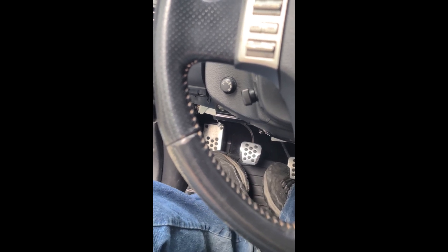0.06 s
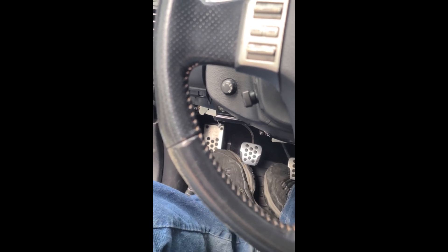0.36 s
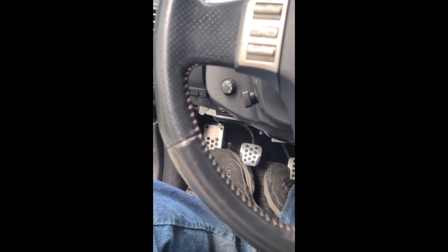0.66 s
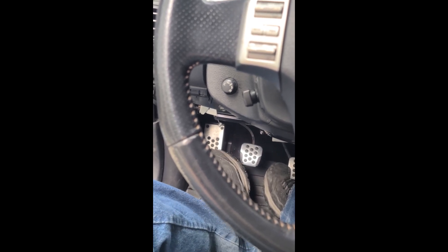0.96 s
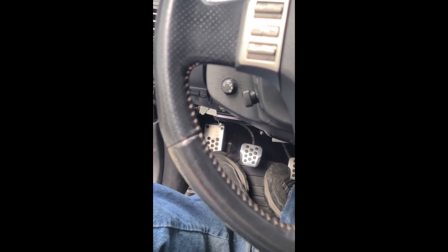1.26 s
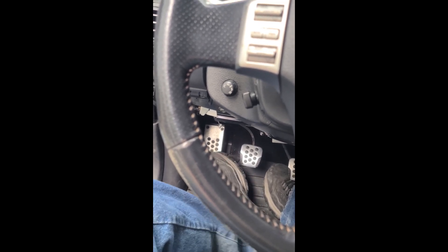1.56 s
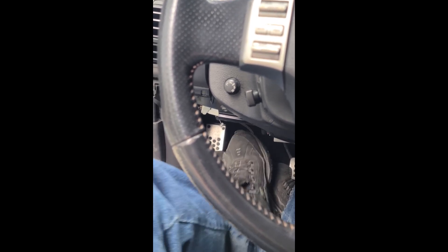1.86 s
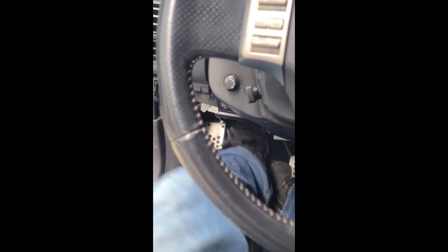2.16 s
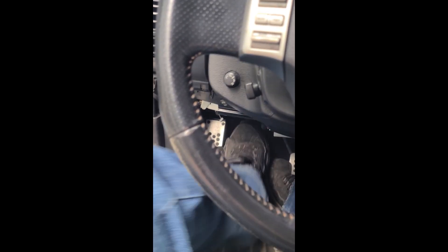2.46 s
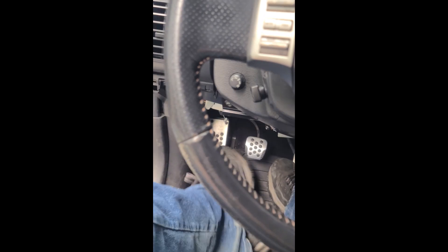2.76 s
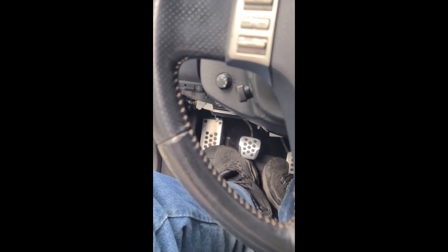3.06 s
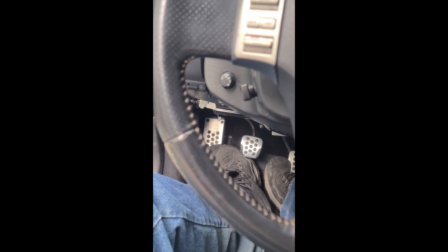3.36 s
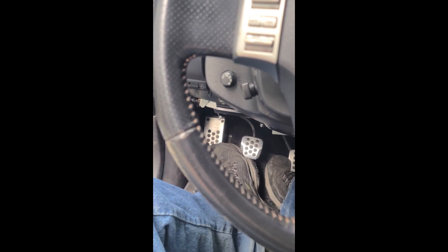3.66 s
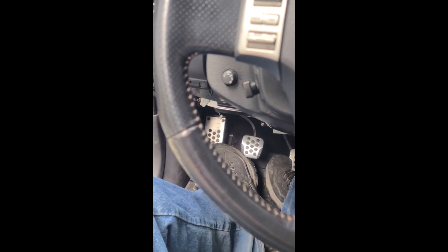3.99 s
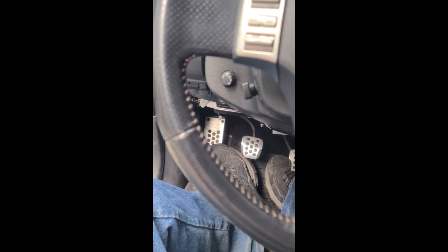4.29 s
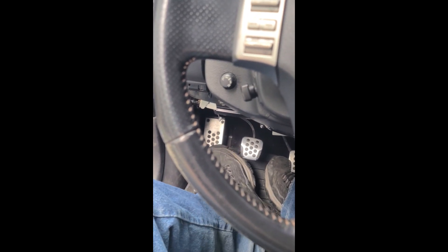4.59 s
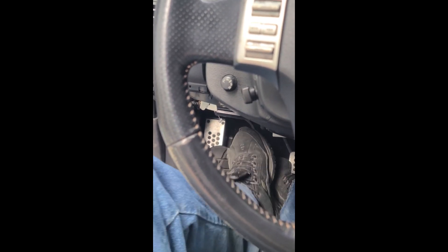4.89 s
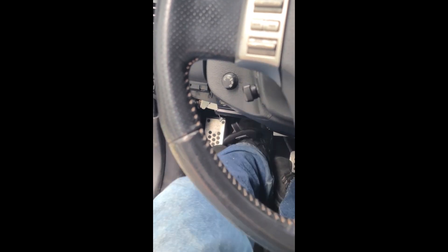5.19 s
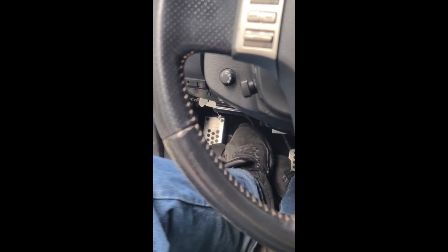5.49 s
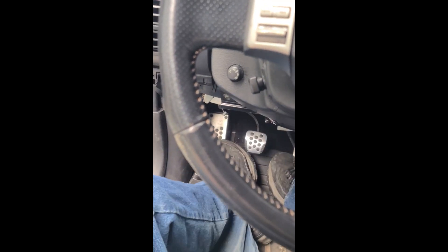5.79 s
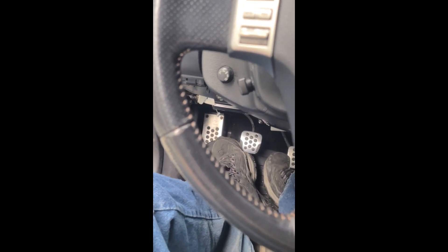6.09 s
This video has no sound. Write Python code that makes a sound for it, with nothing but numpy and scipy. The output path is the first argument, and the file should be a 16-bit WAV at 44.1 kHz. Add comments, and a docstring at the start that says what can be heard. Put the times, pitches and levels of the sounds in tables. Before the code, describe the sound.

A car clutch pedal is pressed and released twice, with dull clunks, light clicks and short creaks over a faint cabin rumble.

```python
"""A clutch pedal worked twice in a parked car, heard from above the steering wheel.
Over a faint cabin rumble, the slack rattles and the pedal clunks against its stop, ringing the bulkhead.
Faint, thin whistles glide by, a shoe scuffs, denim swishes, and at 2 s the foot stamps on the pad.
It rides the pedal down and back while the linkage knocks, ticks and groans along the stroke.
A second clunk at 3.7 s leads to a brighter stamp at 5 s and one more stroke."""
import sys
import numpy as np
from scipy import signal
from scipy.fft import rfft, irfft, next_fast_len
from scipy.io import wavfile

SR = 44100
rng = np.random.default_rng(int(sys.argv[2]) if len(sys.argv) > 2 else 0)


def dump(signal):
    """Clip the signal to [-1, 1] and save it as 16-bit WAV at the path in sys.argv[1]."""
    limited = np.clip(np.atleast_2d(signal).T, -1, 1)
    pcm = np.round(limited * 32767).astype(np.int16)
    wavfile.write(sys.argv[1], SR, pcm)


N = 270774
TIME = np.arange(N) / SR
RIGHT_LAG_S = .00027  # the right microphone hears the footwell later

# Resonances of pedal, bulkhead and cabin. Each row: pitch in Hz, 60 dB decay time in seconds,
# level in dB when struck at the stop, level in dB when struck at the pad.
BODY_MODES = [(63, .28, -26, -27), (75, .16, -16, -15), (103, .085, -10, -11), (128, .14, -18, -10),
              (151, .3, -22, -32), (172, .12, -35, -29), (250, .24, -21, -23), (274, .07, -20, -21),
              (360, .11, -21, -30), (396, .1, -21, -28), (446, .11, -44, -22), (480, .1, -48, -27),
              (705, .11, -32, -25), (750, .08, -34, -23), (802, .1, -38, -22), (877, .08, -31, -25),
              (945, .07, -42, -31), (1013, .1, -42, -24), (1220, .06, -51, -31), (1335, .06, -53, -31),
              (1448, .11, -55, -29), (1545, .09, -44, -34), (1857, .08, -58, -42), (2240, .1, -60, -44),
              (2447, .1, -62, -44), (2643, .1, -62, -41), (3163, .11, -62, -45), (3515, .1, -66, -47),
              (5000, .11, -70, -52)]
# The dull tone of a sole rubbing on rubber. Each row: frequency in Hz, level in dB.
SCUFF_COLOUR = [(120, -10), (250, -1), (440, 0), (600, -9), (950, -8), (1150, -13), (1500, -11),
                (1900, -18), (2700, -20), (4500, -29), (8000, -46)]


def amp(db):
    """Decibels to gain."""
    return 10 ** (np.asarray(db) / 20)


def unit(x):
    """Scales to an rms of one."""
    return x / np.sqrt(np.mean(x ** 2) + 1e-20)


def curve_at(points, hz):
    """Reads a curve on a log-frequency axis."""
    f, value = np.transpose(points)
    return np.interp(np.log(hz + 1), np.log(f + 1), value)


def fade(t, t60):
    """Free decay, 60 dB down after t60 seconds."""
    return np.exp(-np.log(1000) * t / t60)


def swell(t, length, rise, release):
    """Attack, hold and release between t = 0 and length."""
    return np.clip(np.minimum(t / rise, (length - t) / release), 0, 1)


def add(mix, s, sound):
    """Mixes a stereo sound in at s seconds."""
    part = mix[:, max(round(s * SR), 0):][:, :sound.shape[1]]
    part += sound[:, :part.shape[1]]


def drift(count, hz):
    """A random wobble with an rms of one, moving at up to about hz."""
    coarse = rng.standard_normal(count // 20 + 2)
    return unit(np.interp(np.arange(count) * 2 * hz / SR, np.arange(len(coarse)), coarse))


def diffuse(pair, colour, tilt_db=0):
    """Colours two noises, tilted in dB per octave, and spreads them: centred bass, wide treble."""
    # How alike the two sides are. Each row: frequency in Hz, left-right coherence.
    coherence = [(40, .95), (130, .98), (300, .88), (650, .45), (1300, 0), (16000, 0)]
    size = next_fast_len(pair.shape[1], True)
    hz = np.fft.rfftfreq(size, 1 / SR)
    left, unrelated = rfft(pair, size)
    same = curve_at(coherence, hz)
    right = same * left + np.sqrt(1 - same ** 2) * unrelated
    gain = unit(amp(curve_at(colour, hz) + tilt_db * np.log2(hz / SR + 1e-3)))
    return irfft(np.array([left, right]) * gain, size)[:, :pair.shape[1]]


def cabin_rumble(level_db=-43.6, waver_db=.7):
    """The bed: low rumble through the body shell, thinning into a faint hiss."""
    # The tone of the cabin. Each row: frequency in Hz, relative level in dB.
    colour = [(22, 10), (40, 1), (60, -.5), (92, 2), (125, -7), (200, -9), (390, -15), (630, -22),
              (1350, -23), (2000, -32), (5000, -40), (7700, -56), (9300, -51), (15500, -54)]
    return diffuse(rng.standard_normal((2, N)), colour) * amp(level_db + waver_db * drift(N, hz=6))


def cabin_tail(dry, wet_db=-12, bass_t60=.55, treble_t60=.16, build_s=.02):
    """A short reverb: upholstery soaks up the treble at once, while the bass lingers."""
    t = np.arange(SR // 2) / SR
    field = diffuse(rng.standard_normal((2, len(t))), [(0, 0), (SR, 0)])
    hz, frame_s, bands = signal.stft(field, SR, nperseg=512)
    t60 = curve_at([(100, bass_t60), (1500, treble_t60)], hz)[:, None]
    tail = signal.istft(bands * fade(frame_s, t60), SR, nperseg=512)[1][:, :len(t)]
    tail *= (1 - np.exp(-t / build_s)) / np.linalg.norm(fade(t, bass_t60))
    return amp(wet_db) * signal.fftconvolve(dry.mean(0)[None], tail, axes=1)[:, :N]


def denim_swish(grains, gain_db=2, edge_s=.06):
    """Denim slides as the knee moves: an airy brush, smoother than the sole."""
    # The knee's moves. Each row: start in seconds, length in seconds, relative level in dB.
    swishes = [(1.69, .36, -72.5), (2.0, .38, -76.5), (2.4, .38, -77), (4.6, .2, -80), (5.17, .38, -76.5),
               (5.55, .28, -80)]
    # The sheen of the cloth. Each row: frequency in Hz, relative level in dB.
    colour = [(1500, -20), (3500, -2), (5500, -1), (7500, -7), (9000, -1), (10500, 1), (13000, -3),
              (15500, -6)]
    shape = sum(amp(db) * swell(TIME - s, length, edge_s, edge_s) for s, length, db in swishes)
    return amp(gain_db) * diffuse(rng.standard_normal((2, N)) * np.sqrt(grains) * shape, colour)


def sole_scuff(grains, gain_db=1.5, push_s=.18, push_db=5):
    """The sole catches and slides on the rubber pad, harder as the pedal nears the floor."""
    # Push and return. Each row: start in seconds, length in seconds, relative level in dB,
    # easing in dB per second, moment the pedal is down in seconds.
    strokes = [(1.58, 1.62, -50.5, 1.7, 2.29), (4.42, 1.88, -49, 5.3, 5.3)]
    shape = np.zeros(N)
    for s, length, db, easing, down in strokes:
        t = TIME - s
        push = swell(down - TIME, push_s, push_s / 2, push_s / 2)
        shape += amp(db - easing * t + push_db * push) * swell(t, length, rise=.6, release=.25)
    return amp(gain_db) * diffuse(rng.standard_normal((2, N)) * grains * shape, SCUFF_COLOUR)


def leg(grain_db=3, catch_db=2.2):
    """Shoe and denim share one friction texture: fine grains over slower catches."""
    grains = unit(amp(grain_db * drift(N, hz=400) + catch_db * drift(N, hz=35)))
    return sole_scuff(grains) + denim_swish(grains)


def squeaks(mix, waver=.008):
    """Faint, thin, fuzzy whistles and squeaks glide as they swell and fade."""
    # Each row: start in seconds, length in seconds, first and last pitch in Hz, bandwidth in Hz,
    # level in dB, share of the length spent swelling.
    glides = [(1.11, .09, 1200, 2200, 1600, -56, .7), (1.2, .7, 1650, 1350, 400, -60.5, .1),
              (1.195, .36, 1960, 1920, 90, -59, .05), (1.22, .3, 3900, 3840, 180, -72, .3),
              (2.47, .06, 2800, 2600, 600, -55, .3), (2.765, .045, 2400, 2600, 600, -56, .5),
              (3.01, .05, 2600, 2750, 500, -58, .6), (5.72, .11, 2100, 2300, 700, -55, .5),
              (4.2, .24, 9900, 10900, 150, -80, .5), (4.40, .17, 8000, 7800, 100, -66, .3),
              (4.41, .19, 10000, 13700, 200, -77, .2), (4.44, .13, 9800, 7000, 2000, -69, .4)]
    t = np.arange(SR) / SR
    for s, length, start_hz, end_hz, width_hz, level_db, rising in glides:
        hz = np.interp(t, [0, length], [start_hz, end_hz]) * (1 + waver * drift(SR, hz=20))
        phase = 2 * np.pi * np.cumsum(hz) / SR
        lowpass = signal.butter(2, width_hz / 2, fs=SR)
        fuzz = unit(signal.lfilter(*lowpass, rng.standard_normal((2, 2, SR))))
        whistle = fuzz[0] * np.cos(phase) + fuzz[1] * np.sin(phase)
        shape = swell(t, length, rising * length, (1 - rising) * length)
        add(mix, s, amp(level_db) * shape * whistle)


def groans(mix, jitter=.06, overtone_db=-20, grit_db=-13):
    """Pivot and spring stick and slip: a strong, uneven note, weak overtones and grit at each slip."""
    # Each row: start in seconds, length in seconds, slips per second, level in dB.
    runs = [(0.264, .035, 290, -40), (2.172, .04, 450, -43), (2.219, .055, 280, -31),
            (2.374, .042, 265, -36), (2.452, .042, 260, -31), (2.722, .025, 430, -34),
            (2.836, .03, 400, -28), (2.915, .05, 450, -41), (2.995, .07, 440, -43), (5.218, .045, 280, -37),
            (5.452, .05, 255, -33), (5.700, .026, 400, -26)]
    longest = SR // 6
    for s, length, hz, level_db in runs:
        count = int(length * SR)
        turns = np.cumsum(hz * (1 + jitter * drift(longest, hz=150)[:count])) / SR
        phase = 2 * np.pi * np.array([turns, turns - hz * RIGHT_LAG_S])
        overtones = sum(np.sin(k * phase) * 2 / k for k in range(2, 7))
        puffs = rng.standard_normal((2, longest))[:, :count] * (1 + np.cos(phase))
        grit = diffuse(puffs, SCUFF_COLOUR, tilt_db=-2)
        slips = unit(np.sin(phase) + amp(overtone_db) * overtones + amp(grit_db) * grit)
        add(mix, s, amp(level_db) * slips * signal.windows.tukey(count, .8))


def click(level_db, tilt_db, crack_t60=.055, ring_db=-12, ring_t60=.14, rise_s=.003):
    """A crack among the dense modes of the steel bracket, then their short ring."""
    # The bracket's tone. Each row: frequency in Hz, relative level in dB.
    colour = [(150, -30), (550, -13), (880, 1), (1200, -1), (1500, 0), (1950, -7), (2800, -7), (4000, -12),
              (5200, -14), (7000, -27), (9000, -23), (12000, -26), (15500, -35)]
    t = np.arange(SR // 6) / SR
    attack = 1 - np.exp(-(t / rise_s) ** 2)
    decay = fade(t, crack_t60) + amp(ring_db) * fade(t, ring_t60)
    return amp(level_db) * diffuse(rng.standard_normal((2, len(t))) * attack * decay, colour, tilt_db)


def ticks(mix):
    """Play in the metal linkage lets out small, tight ticks."""
    # Each row: start in seconds, level in dB.
    cues = [(2.140, -40.5), (2.399, -50), (2.477, -47), (2.501, -46), (2.591, -42), (2.882, -48),
            (3.163, -52), (5.656, -47), (5.798, -27.5), (6.030, -53)]
    for s, level_db in cues:
        add(mix, s, click(level_db, tilt_db=0, crack_t60=.035))


def mode_rings(bend_lag_s=.002, rise_cycles=.7):
    """Each body mode's free ring at the two microphones, as (side, mode, time)."""
    # Where the ring sits in the stereo image. Each row: frequency in Hz, left minus right in dB.
    balance = [(150, 0), (280, -1.2), (450, -5), (850, -2), (1600, 1), (10000, 1.5)]
    hz, t60 = np.transpose(BODY_MODES)[:2, :, None]
    arrival = bend_lag_s * np.sqrt(hz[0] / hz)  # low bending waves cross the panel more slowly
    sides = []
    for lean, lag in ((.5, 0), (-.5, RIGHT_LAG_S)):
        t = np.maximum(np.arange(SR // 2) / SR - arrival - lag, 0)
        attack = 1 - np.exp(-t * hz / rise_cycles)
        pan = amp(lean * curve_at(balance, hz))
        sides.append(pan * attack * fade(t, t60) * np.sin(2 * np.pi * hz * t))
    return np.array(sides)


def knock(rings, level_db, bass_db, treble_db, place):
    """One blow rings the modes; its place, from 0 at the stop to 1 at the pad, sets their blend."""
    hz, _, stop_db, pad_db = np.transpose(BODY_MODES)
    tone_db = curve_at([(110, bass_db), (400, 0), (1500, treble_db)], hz)
    return amp(level_db + tone_db + (1 - place) * stop_db + place * pad_db) @ rings


def jolts(mix, rings):
    """Lighter blows along the stroke, each shaking a click out of the linkage."""
    # Each row: start in seconds, relative level in dB, extra bass in dB, extra treble in dB,
    # place from 0 (stop) to 1 (pad).
    blows = [(0.265, -20, 0, -12, .1), (1.106, -27, -3, -3, .9), (1.904, -22, -5, -3, .9),
             (2.214, -12, -7, -6, .9), (2.246, -4.5, -2.5, -6, .9), (2.380, -22, 3, -2, .9),
             (2.457, -22, -8, -2, .8), (2.497, -15, -10, -3, .9), (2.699, -10.5, -3, -10, .8),
             (2.725, -14, -15, -12, .9), (2.837, -2.5, 2, -9, .25), (2.903, -19, 3, -7, .7),
             (2.962, -26, 13, -8, .3), (3.088, -25, -12, -3, .9), (4.071, -29, -3, 0, .9),
             (4.906, -25, -6, -4, .9), (5.262, -11, 0, -4, .9), (5.297, -13, 0, -3, .9),
             (5.390, -25, -6, -1, .9), (5.481, -15, -10, 1, .9), (5.686, -11, -6, -6, .6),
             (5.705, -4, -11, -7, .75), (5.717, -7, -12, -7, .8), (5.785, -15, -3, 0, .8),
             (5.799, -12, -8, 6, .95), (5.947, -21, -1, -5, .5)]
    for s, level_db, bass_db, treble_db, place in blows:
        add(mix, s, knock(rings, level_db, bass_db, treble_db, place))
        click_db = -38.5 + .45 * level_db + 1.3 * treble_db  # stronger, harder blows shake the metal more
        add(mix, s, click(click_db, tilt_db=-2.2))


def stamps(mix, rings, touch_s=.029, chatter_s=.016, settle_s=.108, place=.96):
    """The sole touches, the linkage cracks taut, the weight lands, metal chatters, the foot settles."""
    # Each row: landing in seconds, relative level in dB, extra treble in dB,
    # level of the crack in dB, the crack's lead in seconds.
    landings = [(1.973, 2.7, -4.5, -30, .006), (4.977, 3.5, 4, -19.5, .001)]
    for s, level_db, treble_db, crack_db, lead_s in landings:
        add(mix, s - touch_s, click(level_db=-41, tilt_db=-2.5))
        add(mix, s - touch_s, knock(rings, level_db - 13, bass_db=1, treble_db=-6, place=place))
        add(mix, s - lead_s, click(crack_db, tilt_db=-2.5))
        add(mix, s, knock(rings, level_db, bass_db=1, treble_db=treble_db, place=place))
        add(mix, s + chatter_s, click(crack_db - 16, tilt_db=-.9, crack_t60=.09))
        add(mix, s + settle_s, knock(rings, level_db - 28, bass_db=8, treble_db=-12, place=place))


def clunks(mix, rings):
    """The slack rattles, its first contact nudging the bracket, then the pedal falls against its stop."""
    # Hits on the stop. Each row: start in seconds, relative level in dB.
    hits = [(0.767, 3.3), (3.709, 3.6)]
    # The rattle into each hit. Each row: lead in seconds, level in dB, tilt in dB per octave.
    rattle = [(.0215, -38.5, -.6), (.008, -41, -3), (0, -39.5, -.4)]
    nudge_lead_s = rattle[0][0]
    for s, level_db in hits:
        for lead_s, click_db, tilt_db in rattle:
            add(mix, s - lead_s, click(click_db, tilt_db))
        add(mix, s - nudge_lead_s, knock(rings, level_db=-18, bass_db=-11, treble_db=0, place=.55))
        add(mix, s, knock(rings, level_db, bass_db=1.5, treble_db=-1.5, place=.02))


def scene():
    """The pedal and its cabin reverb up front, over the leg, the squeaks and the rumble."""
    pedal, rings = np.zeros((2, N)), mode_rings()
    clunks(pedal, rings)
    stamps(pedal, rings)
    jolts(pedal, rings)
    ticks(pedal)
    groans(pedal)
    mix = pedal + cabin_tail(pedal) + leg() + cabin_rumble()
    squeaks(mix)
    return mix


def record(dry, low_hz=47, high_hz=15720):
    """The microphone loses the deepest bass, and a steep high cut trims the very top."""
    thinned = signal.sosfilt(signal.butter(3, low_hz, "high", fs=SR, output="sos"), dry)
    high_cut = signal.firwin(511, high_hz, window=("kaiser", 9), fs=SR)
    return signal.oaconvolve(thinned, high_cut[None], "same")


dry = scene()
out = record(dry)
dump(out)
```